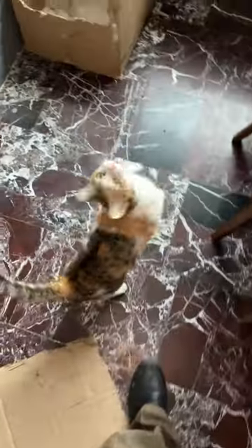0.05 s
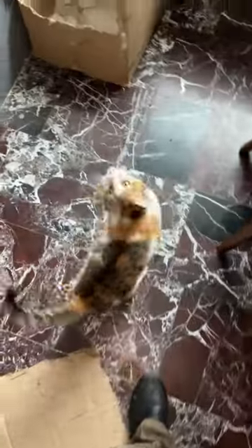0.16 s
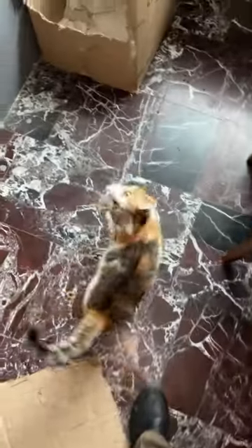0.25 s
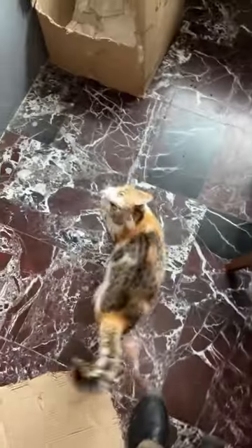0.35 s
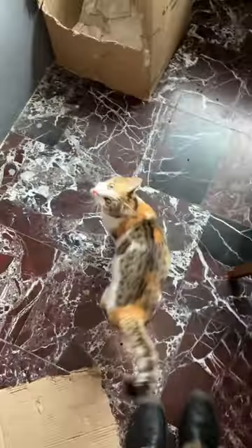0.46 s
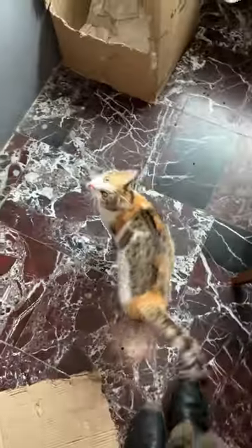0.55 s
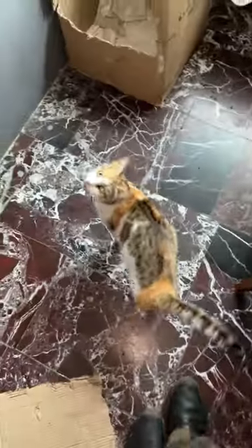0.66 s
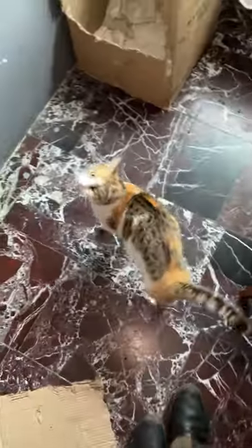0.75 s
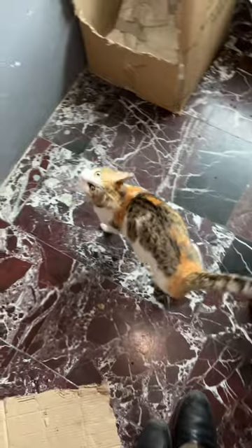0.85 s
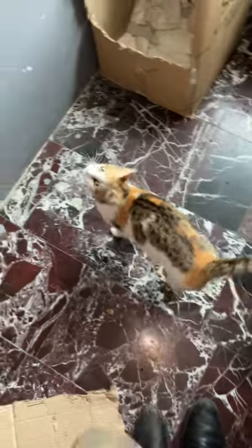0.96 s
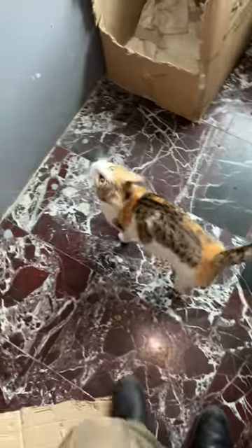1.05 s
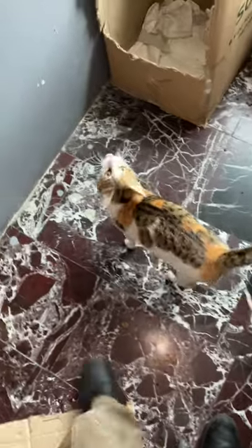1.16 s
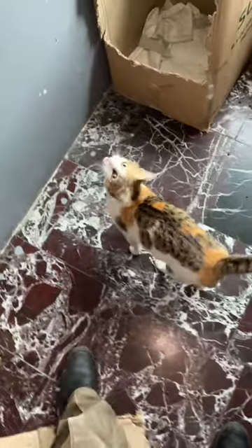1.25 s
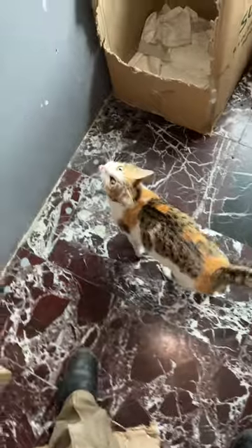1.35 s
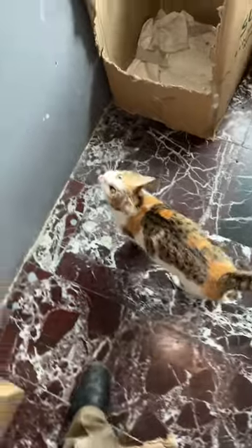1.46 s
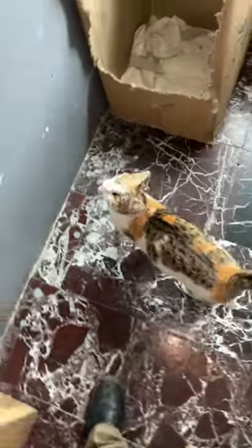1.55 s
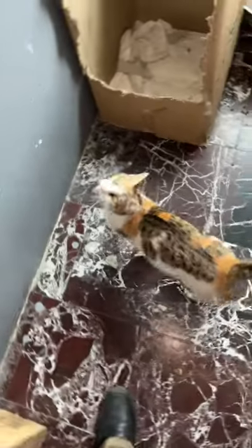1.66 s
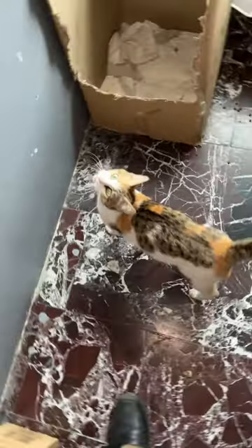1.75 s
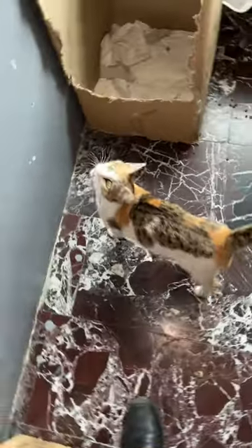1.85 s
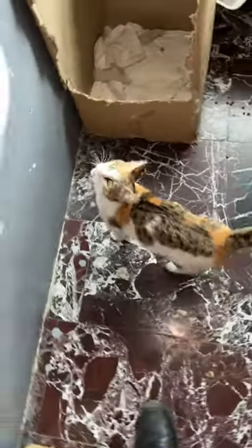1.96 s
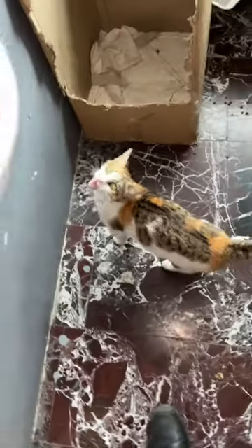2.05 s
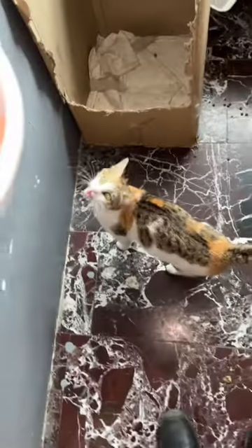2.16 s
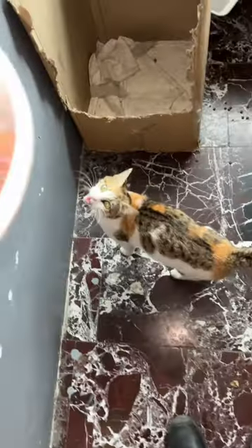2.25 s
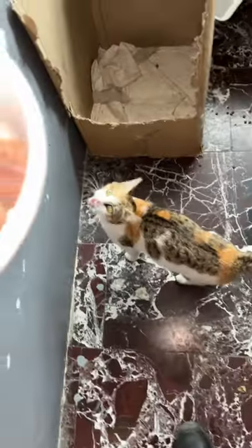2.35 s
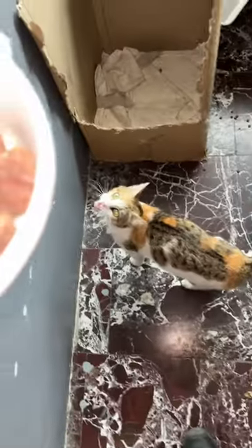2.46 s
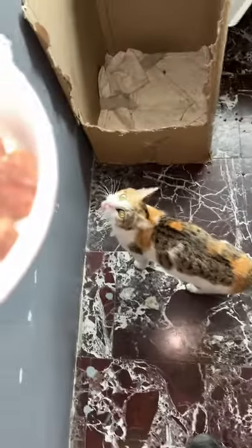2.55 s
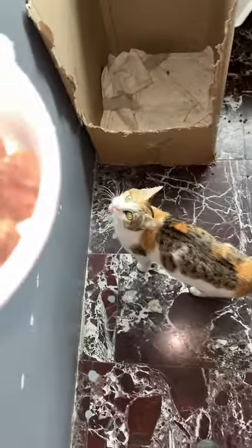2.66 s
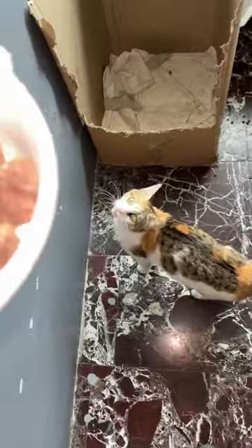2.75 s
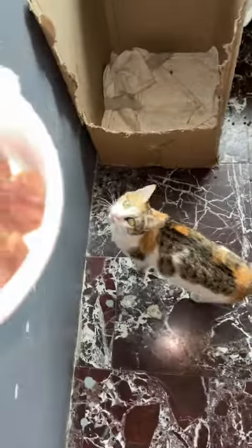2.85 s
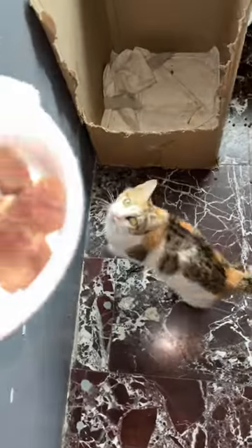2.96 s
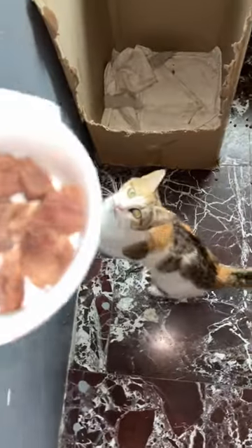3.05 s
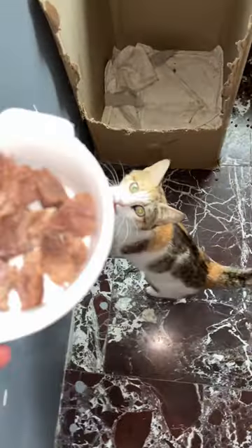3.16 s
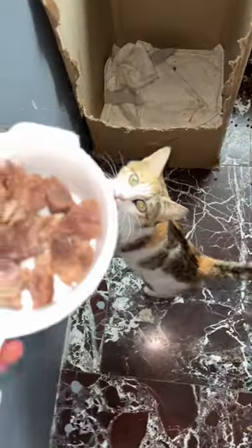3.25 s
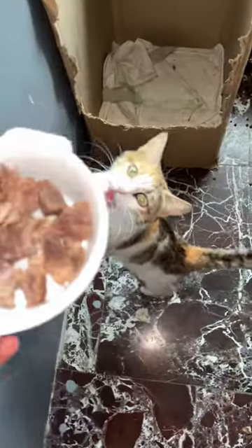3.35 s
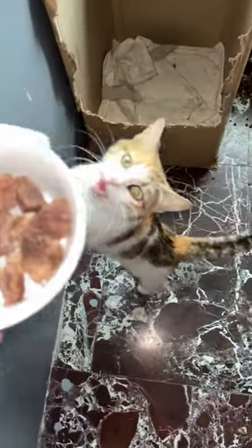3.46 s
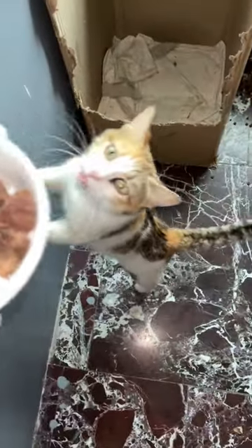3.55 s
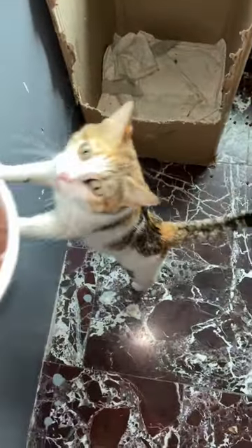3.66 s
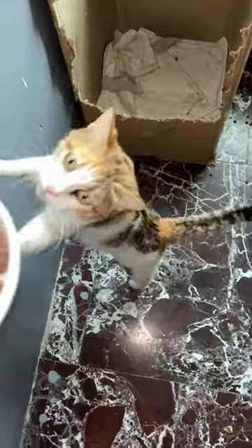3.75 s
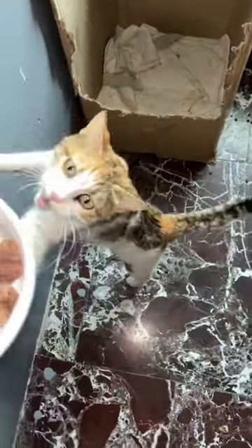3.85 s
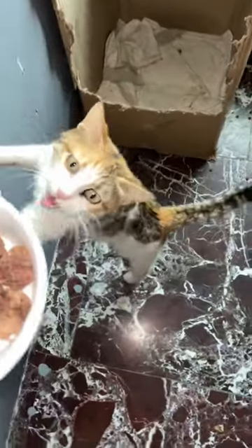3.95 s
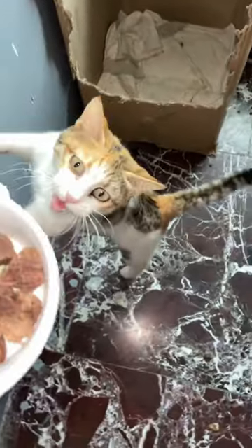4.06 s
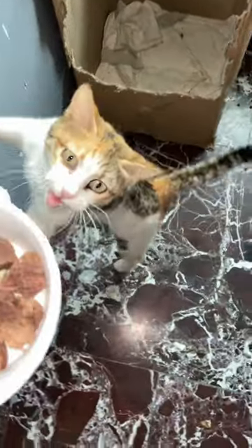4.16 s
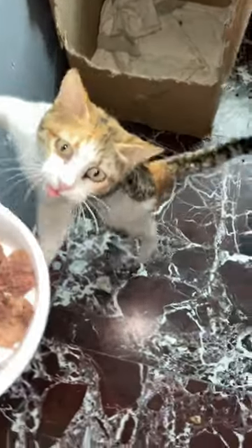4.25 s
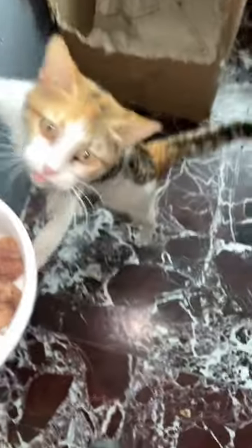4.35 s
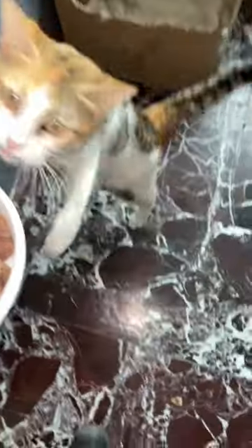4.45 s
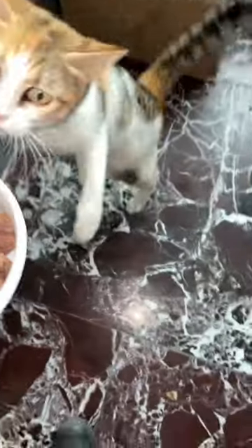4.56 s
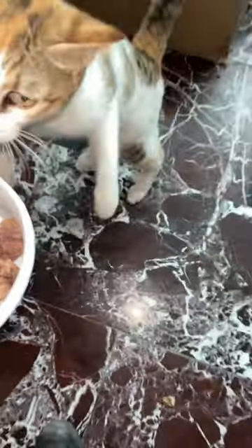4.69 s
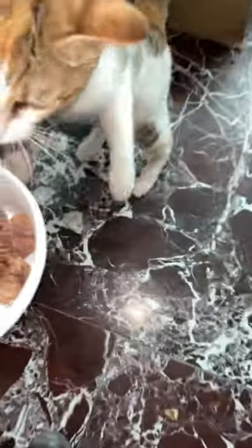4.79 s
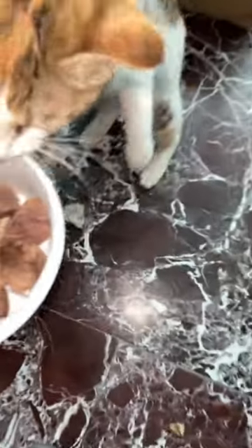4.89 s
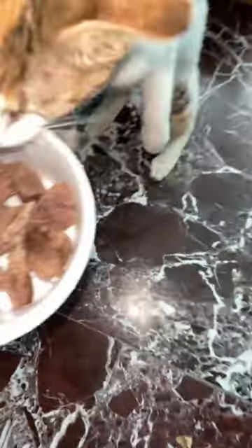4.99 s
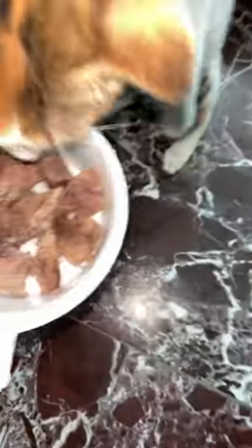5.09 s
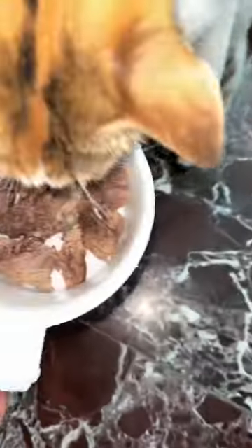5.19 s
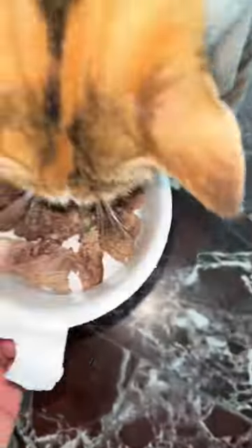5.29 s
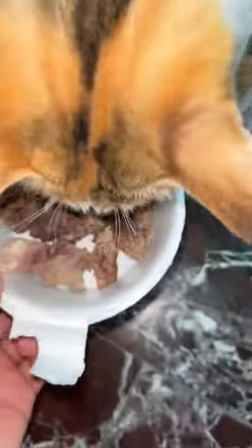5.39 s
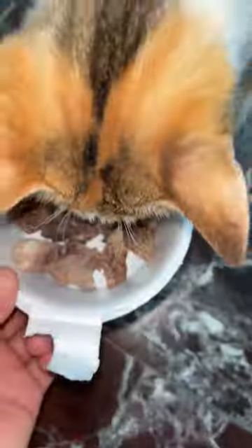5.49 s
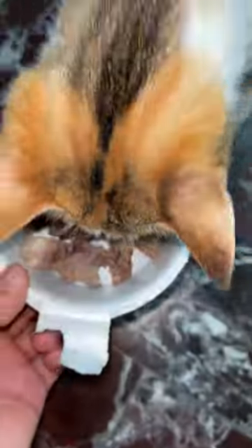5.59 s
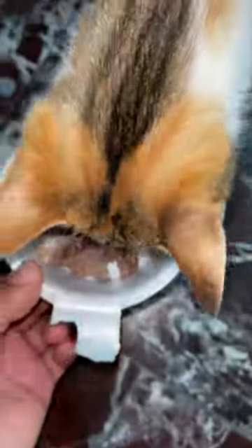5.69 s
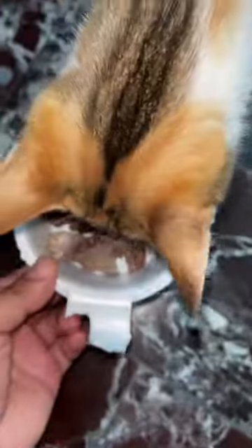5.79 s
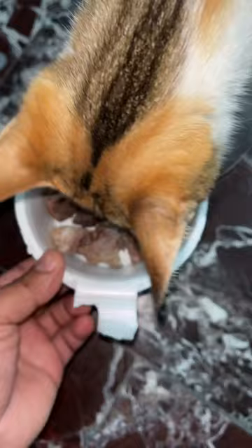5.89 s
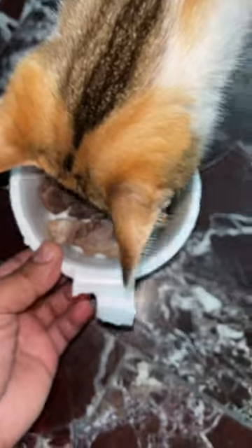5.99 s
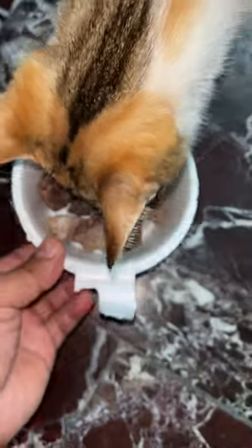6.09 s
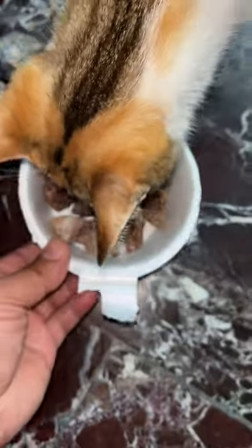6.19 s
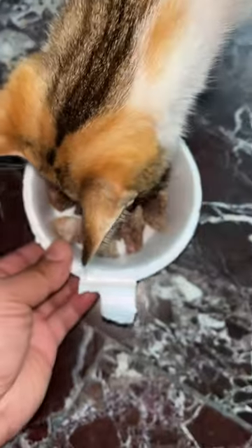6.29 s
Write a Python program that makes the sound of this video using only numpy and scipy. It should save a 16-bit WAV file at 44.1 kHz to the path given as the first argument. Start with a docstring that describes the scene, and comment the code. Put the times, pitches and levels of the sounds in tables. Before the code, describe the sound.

Close stereo phone pickup in a tiled indoor space: five pleading cat calls, the first long, the fourth short and strong, each wavering in pitch with rough cracks. Beneath lie low electrical hum, soft rumble and handling rustle. Thin squeaks and light ticks slip between calls, one tick quite sharp. When the meowing stops, dull little thuds, airy hiss, a faint squeak and more ticks remain.

```python
"""A cat meows five times close to a hand-held phone in a tiled room; its voice breaks between registers.
From the start a wavering motor hum (sines), rumble and rustling air (shaped noise) lie under the calls.
The voice is a series of partials shaped by mouth and throat resonances, roughened by uneven pulses.
A faint low drone, then thin squeaks (gliding partials) and ticks (noise bursts) come in among the calls;
two thuds (decaying sines), a last faint squeak and more ticks follow as the calls end."""
import sys
import numpy as np
from scipy import signal
from scipy.fft import rfft, irfft
from scipy.io import wavfile
from scipy.ndimage import uniform_filter1d

SR = 44100
rng = np.random.default_rng(int(sys.argv[2]) if len(sys.argv) > 2 else 0)


def decibels_to_gain(level_db):
    """Convert a level in decibels to a linear amplitude gain (20 dB per decade)."""
    exponent = np.asarray(level_db, float) / 20
    return 10 ** exponent


def digitize_waveform(pressure):
    """Quantize a signal to 16-bit integers and store it at the path in sys.argv[1].

    Rows of a 2-D input are taken as channels; values are limited to [-1, 1].
    """
    field = np.atleast_2d(pressure).T
    bounded = np.clip(field, -1, 1)
    quanta = np.round(bounded * 32767).astype(np.int16)
    wavfile.write(sys.argv[1], SR, quanta)


N = 279153
T = np.arange(N) / SR
HZ = np.maximum(np.arange(N // 2 + 1) * SR / N, 1)


def on_hz(table, column, hz=HZ):
    """A spectral table interpolated linearly along log frequency."""
    table = np.array(table, float)
    return np.interp(np.log(hz), np.log(table[:, 0]), table[:, column])


def on_time(table):
    """Envelopes: every column of a table interpolated linearly in time."""
    s, *columns = np.transpose(table)
    return [np.interp(T, s, c) for c in columns]


def unit(x):
    """Normalisation to a root mean square of 1."""
    return x / np.sqrt(np.mean(x ** 2))


def noise(spectrum):
    """Coloured noise of rms 1: white noise weighted in the frequency domain."""
    white = rfft(rng.standard_normal(N))
    return unit(irfft(white * decibels_to_gain(on_hz(spectrum, 1)), N))


def walk(rate):
    """Slow random modulation of rms 1: noise smoothed twice over 1 / rate [Hz] seconds."""
    k = int(SR / rate)
    smooth = uniform_filter1d(rng.standard_normal(N), k)
    return unit(uniform_filter1d(smooth, k))


def sounding(tables, join_s, fade_s):
    """Gating: 1 while a table runs, bridging short gaps, with soft ends."""
    on = sum((T >= t[0][0] - join_s) & (T <= t[-1][0] + join_s) for t in tables) > 0
    return uniform_filter1d(1. * on, int(fade_s * SR))


def folds():
    """Period doubling and hoarseness of the vocal folds, as shares over time."""
    # stretches of uneven pulses: (start [s], length [s], every-second-pulse share, every-fourth-pulse share)
    breaks = [(0.539, .18, 0.09, 0), (2.195, .13, 1, 0.06), (2.325, .25, 0.2, 0.08), (3.463, .1, 0.02, 0),
              (4.063, 0.17, 0.71, 0.5), (4.222, 0.13, 0.9, .05)]
    # hoarse catches that hold and die away: (time [s], hoarseness [0-1], hold [s], decay time constant [s])
    catches = [(0, 0.35, 0.062, .02), (0.741, 0.42, 0.034, .2), (1.12, 0.16, 0.056, .02),
               (1.19, 0.38, .07, .02), (2.2, 0.18, 0.051, .1), (2.539, 0.41, 0.063, .1),
               (3.11, 0.2, .08, .05), (3.467, 0.4, .05, .1), (4.04, .55, 0.051, 0.036),
               (4.358, 0.4, .03, .1)]
    clear_uneven, clear_hoarse = 0.038, 0.1  # shares in the steady voice
    held = [uniform_filter1d(1. * ((T >= s) & (T < s + length)), size=700)
            for s, length, _, _ in breaks]
    half = clear_uneven + sum(row[2] * h for row, h in zip(breaks, held))
    quarter = sum(row[3] * h for row, h in zip(breaks, held))
    hoarse = 0
    for s, share, hold_s, dying_s in catches:
        hoarse = hoarse + share * (T >= s) * np.exp(-np.maximum(T - s - hold_s, 0) / dying_s)
    return half, quarter, clear_hoarse + uniform_filter1d(hoarse, size=500)


def cat():
    """Source and filter: partials of the fold pulses shaped by mouth and throat, with subharmonics."""
    # one table per call: (time [s], pitch [Hz], effort [dB], mouth level [dB], mouth resonance [Hz])
    meows = [
        [(0.0, 447, -35, -21.5, 2600), (0.02, 450.4, -41, -35.5, 2260), (0.098, 458.6, -50, -42, 2550),
         (0.106, 598.4, -40, -27, 2210), (0.19, 562.5, -41, -26.5, 2140), (0.27, 578.3, -44.5, -37.5, 1860),
         (0.4, 605.6, -40, -34, 2090), (0.5, 669.6, -37.5, -32, 2360), (0.64, 653.4, -36.5, -23.5, 2250),
         (0.752, 601.5, -43.5, -35.5, 2340), (0.762, 511.7, -38.5, -39.5, 2210), (0.86, 465, -69, -55.5, 2084)],
        [(1.116, 492, -60.5, -53, 2010), (1.13, 488.3, -39, -32, 2000), (1.144, 492, -38.5, -28.5, 2150),
         (1.153, 452, -38.5, -23, 2290), (1.18, 461, -36, -28, 2350), (1.24, 522.2, -45.5, -44.5, 2340),
         (1.27, 549, -39, -32, 2220), (1.33, 558, -40, -30.5, 2314), (1.39, 577.2, -45, -20, 2310),
         (1.455, 575.3, -44, -23.5, 2310), (1.49, 570, -41.5, -32.5, 2070), (1.58, 532, -50, -44.5, 1890),
         (1.68, 525, -80.5, -87, 1940)],
        [(1.984, 502, -44.5, -40, 1920), (2.0, 524, -47, -27.5, 2120), (2.035, 532, -40, -18.5, 2482),
         (2.07, 561, -46.5, -30, 2180), (2.09, 622.5, -36, -38.5, 2320), (2.2, 626, -37.5, -30, 2630),
         (2.23, 592.6, -46.5, -26.5, 2490), (2.3, 610.2, -42, -28, 2420), (2.46, 591.2, -39, -32, 2130),
         (2.545, 549.7, -48.5, -46, 1876), (2.575, 487.6, -54.5, -55, 2050), (2.63, 459, -75, -66, 2220)],
        [(3.106, 462.8, -52, -43, 2680), (3.125, 512, -30, -30, 2230), (3.155, 570.6, -37, -20.5, 2390),
         (3.2, 664, -39.5, -36.5, 2567), (3.26, 661, -36, -28, 2620), (3.43, 653.2, -31.5, -30, 2420),
         (3.5, 635, -35, -40.5, 2130), (3.535, 621, -63, -48, 2064)],
        [(3.814, 459, -54.5, -41.5, 2015), (3.83, 501.7, -38.5, -27, 2210), (3.855, 536, -40, -18.5, 2400),
         (3.885, 560, -44, -34, 2220), (3.895, 608.5, -34.5, -34.5, 2400), (4.0, 645, -34, -23.5, 2330),
         (4.035, 654.2, -43.5, -24, 2639), (4.047, 612, -35.5, -23.5, 2775), (4.15, 613, -34, -28, 2740),
         (4.23, 611.7, -36, -28.5, 2600), (4.33, 588.4, -39, -24.5, 2080), (4.372, 577.3, -48.5, -32, 1990),
         (4.395, 580, -67, -56, 2077)],
    ]
    # one row per call, at middle effort and pitch:
    # (first partial level [dB], second partial level [dB], width of the mouth resonance [Hz])
    timbres = [(-43, -42.5, 325), (-50.5, -38, 314), (-44, -43.5, 397), (-39.5, -43.5, 400),
               (-38.5, -38, 377)]
    # throat response to the upper partials: (frequency [Hz], level relative to effort [dB])
    upper_throat = [(2800, -19), (3500, -5), (4500, -12), (5500, -7.5), (7000, -18), (9000, -32),
                    (12000, -36), (15000, -49)]
    # breath noise shape: (frequency [Hz], relative spectral level [dB])
    breath_shape = [(1500, -26.5), (3000, 5), (6000, -2.5), (8000, -11.5), (12000, -19), (16000, -19.5)]
    middle_db, middle_hz, faint_db = -40, 600, -50

    gate = sounding(meows, 0.0031, 0.0026)
    on = gate > 0
    rows = [row + timbre for call, timbre in zip(meows, timbres) for row in call]
    tracks = np.array(on_time(rows))[:, on]
    hz, throat_db, mouth_db, mouth_hz, first_db, second_db, width_hz = tracks
    half, quarter, hoarse = np.array(folds())[:, on]

    def waver(rate):
        """Random modulation, cut to the samples where the voice sounds."""
        return walk(rate)[on]

    # the low partials follow effort in part, and collapse with it when faint
    push_db = 0.41 * (throat_db - middle_db) + .5 * np.minimum(throat_db - faint_db, 0)
    # the first partial radiates better at higher pitch: 11.5 dB per octave
    pitch_db = 11.5 * np.log2(hz / middle_hz)
    first_db = first_db + push_db + pitch_db + 3.4 * waver(18)
    second_db = second_db + push_db + 1.9 * waver(10)
    jitter = 0.0035 * waver(60) + 0.035 * hoarse * waver(250)
    turn = 2 * np.pi * np.cumsum(hz * (1 + jitter)) / SR
    # strong and weak pulses alternate, and so do long and short cycles
    uneven = half * decibels_to_gain(0.94 * waver(30)) * np.cos(turn / 2) + quarter * np.cos(turn / 4)
    turn = turn + 0.28 * uneven
    low = decibels_to_gain(first_db) * np.cos(turn) + decibels_to_gain(second_db) * np.cos(2 * turn + 1)

    mouth = throat = power = 0
    for k in range(3, 27):
        detune = (k * hz - mouth_hz) / width_hz
        # the phase turns through the resonance
        partial = np.cos(k * turn - 2 * np.arctan(detune) + .3 * k ** 2)
        mouth = mouth + decibels_to_gain(2.2 * waver(35)) * partial / (1 + detune ** 2)
        power = power + 1 / (1 + detune ** 2) ** 2
        partial_db = on_hz(upper_throat, 1, k * hz) + 4.0 * waver(21) + 1.8 * waver(120)
        throat = throat + decibels_to_gain(partial_db) * partial
    high = decibels_to_gain(mouth_db) * mouth / np.sqrt(power) + decibels_to_gain(throat_db) * throat
    breath = decibels_to_gain(throat_db - 24.5) * (1 + 3 * hoarse) * noise(breath_shape)[on]
    flutter = hoarse * np.tanh(waver(570))
    # unevenness spreads the energy of the upper partials and adds none
    swing = 1 + 0.14 * uneven + 1.2 * flutter
    swing = swing / np.sqrt(uniform_filter1d(swing ** 2, size=900))
    low = low * (1 + 0.49 * uneven + 0.5 * flutter)
    voice = np.zeros(N)
    voice[on] = gate[on] * (low + high * swing + breath)
    # so small a head radiates little below its pitch
    radiation = signal.butter(4, 400, "high", fs=SR, output="sos")
    return np.sqrt(2) * signal.sosfilt(radiation, voice)


def hum():
    """Frequency and amplitude modulation of a motor tone, beside steadier mains tones."""
    motor_level = [(0, -38), (.4, -38), (1.18, -35), (1.8, -47), (3.0, -48.5), (3.3, -48.5), (5.6, -49),
                   (6.2, -48.5)]  # motor tone: (time [s], level [dB rms])
    mains = [(120, -50.5), (361, -71)]  # mains tones: (frequency [Hz], level before the swell [dB rms])
    mains_swell = [(0, 0), (4.0, -1), (5.2, 2.5)]  # (time [s], level change [dB])
    motor_hz = 60.4
    db, = on_time(motor_level)
    # the quieter the motor tone, the more it wanders
    loose = np.clip((-39.5 - db) / 8, .1, 1)
    strength = decibels_to_gain(db + loose * (2.0 * walk(29) + 3.8 * walk(4.3)))
    motor_turn = 2 * np.pi * np.cumsum(motor_hz + 3 * loose * walk(4.3)) / SR
    out = strength * np.cos(motor_turn)
    for mains_hz, mains_db in mains:
        strength = decibels_to_gain(mains_db + on_time(mains_swell)[0] + 0.5 * walk(8.2))
        out = out + strength * np.cos(2 * np.pi * mains_hz * T + 0.47 * walk(4))
    return np.sqrt(2) * out * decibels_to_gain(np.array([[.5], [-.5]]))  # left 1 dB stronger


def air():
    """Coherence of noise: rumble and bumping mostly shared by the ports, rustle unrelated, hiss common."""
    # (time [s], rumble level before an 8 dB lift [dB], rustle level [dB], hiss level [dB])
    levels = [(0, -62.5, -45, -87.5), (.9, -63.5, -51, -81), (1.2, -68.5, -57, -82),
              (2.7, -58.5, -54.5, -85), (2.95, -50.5, -56, -70.5), (3.7, -60, -50.5, -69),
              (4.45, -59, -51.5, -57.5), (5.0, -66.5, -52, -61), (5.5, -59.5, -55.5, -70.5),
              (6.05, -61, -65.5, -78), (6.33, -55, -57.5, -89)]
    bumping = [(0, -59), (1.1, -57.5), (1.8, -58.5), (2.9, -58.5), (4.3, -65), (5.5, -72)]  # low, uneven bumping: (time [s], level [dB])
    puff_list = [(2.953, 0.069, -78), (3.648, 0.028, -60.5)]  # short puffs of hiss: (centre [s], length [s], level [dB])
    # noise shapes, each: (frequency [Hz], relative spectral level [dB])
    rumble_shape, bump_shape = [(20, -25.5), (40, -0.5), (60, -8.5), (85, -3.5), (140, -6.5), (200, -17),
                                (300, -24), (450, -30.5), (700, -58.5)], [(130, -28.5), (170, 0.5), (300, -2), (450, -6),
                                                (600, -41.5)]
    rustle_shape, hiss_shape = [(250, 6), (450, 4), (1000, 0), (2500, -2), (4000, -3.5), (5200, -11.5),
                                (6500, -31.5)], [(4000, -8), (5500, 7.5), (8000, 0.5), (11000, -3),
                                                (14500, -3.5), (15800, -21)]

    rumble_db, rustle_db, hiss_db = on_time(levels)
    rumble = noise(rumble_shape) + 0.33 * np.array([noise(rumble_shape), noise(rumble_shape)])
    rumble = decibels_to_gain(rumble_db + 8.0 + 0.73 * walk(4.0)) * rumble
    # each octave of the rustle wavers by itself
    whole = rfft(np.array([noise(rustle_shape), decibels_to_gain(-3.5) * noise(rustle_shape)]))
    octave = np.floor(np.log2(HZ / 250))
    rustle = sum(decibels_to_gain(1.0 * walk(7.3)) * irfft(whole * (octave == k), N) for k in range(5))
    bumps = noise(bump_shape) * decibels_to_gain(np.array([[3], [-3]]))
    bumps = bumps + 0.1 * np.array([noise(bump_shape), noise(bump_shape)])
    bumps = decibels_to_gain(on_time(bumping)[0] + 2.54 * walk(15)) * bumps
    puffs = sum(decibels_to_gain(db) * np.exp(-((T - s) / length * 2) ** 2) for s, length, db in puff_list)
    hiss = (decibels_to_gain(hiss_db + 1.8 * walk(5)) + puffs) * noise(hiss_shape)
    return rumble + decibels_to_gain(rustle_db) * rustle + bumps + hiss


def room(x):
    """Reverberation: a dense tail from tiles and walls, different at each port, treble dying first."""
    t60_s, treble_t60_s, room_db = 0.38, 0.24, -11
    t = T[:SR]
    out = []
    for side_db in (1, -1):
        grit = rng.standard_normal(SR)
        dull = uniform_filter1d(grit, size=6)
        tail = dull * decibels_to_gain(-60 * t / t60_s) + .5 * (grit - dull) * decibels_to_gain(-60 * t / treble_t60_s)
        tail = tail * np.minimum(t / 0.0088, 1)  # the tail builds up over 8.8 ms
        tail = tail / np.sqrt(np.sum(tail ** 2))
        out.append(decibels_to_gain(room_db + side_db) * signal.fftconvolve(x, tail)[:N])
    return np.array(out)


def squeaks():
    """Harmonic series of four partials, pitch settling exponentially: squeaks swell and fade, a drone fades."""
    # thin squeaks and one low drone:
    # (start [s], start to middle point [s], middle point to end [s], level at the middle point [dB])
    courses = [(2.908, 0.22, .1, -39.5), (1.8, 0.13, .04, -52), (5.05, 0.14, 0.52, -57.5),
               (.53, .33, 0.38, -54)]
    # the next three have one row per tone
    pitches = [(2110, 1622), (2440, 2385), (1374, 1370), (144, 145.4)]  # (first pitch [Hz], settled pitch [Hz])
    # relative to the middle point: (level at the start [dB], level at the end [dB])
    edges = [(-12, -5), (-20, -7), (-1, -19), (2.5, -11.5)]
    # (relative level of partial 1 [dB], partial 2 [dB], partial 3 [dB], partial 4 [dB])
    partial_levels = [
        [-10.5, 5.5, -7, -45],
        [-2, -23, -37, -46],
        [-6.5, -9, -5, -2.5],
        [-26, -7, 0, -23],
    ]
    settle_s, edge_s = 0.05, 0.008
    out = 0
    for (s, first_s, last_s, db), (from_hz, to_hz), (start_db, end_db), partials in zip(
            courses, pitches, edges, partial_levels):
        shape = [(s, db + start_db), (s + first_s, db), (s + first_s + last_s, db + end_db)]
        hz = to_hz + (from_hz - to_hz) * np.exp(-np.maximum(T - s, 0) / settle_s)
        turn = 2 * np.pi * np.cumsum(hz * (1 + 0.011 * walk(60))) / SR
        tone = sum(decibels_to_gain(p) * np.cos((k + 1) * turn) for k, p in enumerate(partials))
        strength = decibels_to_gain(on_time(shape)[0] + 2.0 * walk(30))
        out = out + np.sqrt(2) * strength * tone * sounding([shape], 0, edge_s)
    return out


def knocks():
    """Impact and damping: ticks are noise bursts of a few milliseconds, thuds soft decaying sines."""
    ticks = [(2.706, -44.5), (2.7782, -49.5), (3.427, -23.5), (5.208, -44.5), (5.2985, -50.5), (5.782, -51)]  # (time [s], level before a 4 dB cut [dB])
    # (time [s], level before onset and decay [dB], frequency [Hz], t60 [s])
    thuds = [(4.492, -30.5, 312, 0.043), (4.665, -39, 800, 0.04)]
    bright = noise([(2500, -1), (4000, 7.0), (15000, 2.5)])
    body = noise([(400, -41.5), (900, -13.5), (3000, -0.5), (5000, -22)])
    out = 0
    for s, db in ticks:
        fade = (T >= s) * np.exp(-np.maximum(T - s, 0) / 0.0033)
        out = out + decibels_to_gain(db - 4.0) * fade * (bright + .5 * body)
    for s, db, hz, t60 in thuds:
        age = np.maximum(T - s, 0)
        envelope = (1 - np.exp(-age / 0.003927)) * decibels_to_gain(-60 * age / t60)
        out = out + decibels_to_gain(db) * np.sin(2 * np.pi * hz * age) * envelope
    return out


def scene():
    """Superposition: near sounds reach the ports with unlike level and phase; room, hum and air join."""
    # near sounds at the two ports: (frequency [Hz], left minus right level [dB], lead of the right [rad])
    ports = [(100, 2.5, 1), (350, 9, 1.14), (704, 7.5, 1.06), (1720, -2.5, 0.94), (2290, 4, -0.94),
             (2916, -5.5, -2), (3600, 0.5, -1.53), (4700, -7, -2.5)]
    near = (cat() + squeaks() + knocks()) * np.minimum(T / .004, 1)
    skew = decibels_to_gain(on_hz(ports, 1) / 2) * np.exp(-.5j * on_hz(ports, 2))
    direct = irfft(rfft(near) * np.array([skew, 1 / skew]), N)
    return decibels_to_gain(-2.0) * direct + room(near) + hum() + air()


def roll_off(x):
    """The treble ends steeply here."""
    return signal.sosfilt(signal.butter(12, 15750, fs=SR, output="sos"), x)


def record(dry):
    """Linear phase delay: the left port's treble feeds both channels, the right a quarter millisecond late."""
    shared_above_hz, in_step_hz = 5000, 8100
    turn_hz = 4300  # the phase lag gains a full turn in this span
    left, right = rfft(dry)
    share = np.clip((HZ - shared_above_hz) / 800 + .5, 0, 1)
    late = left * np.exp(-2j * np.pi * (HZ - in_step_hz) / turn_hz)
    mix = irfft(np.array([left, (1 - share) * right + share * late]), N)
    return roll_off(mix)


dry = scene()
out = record(dry)
digitize_waveform(out)
```